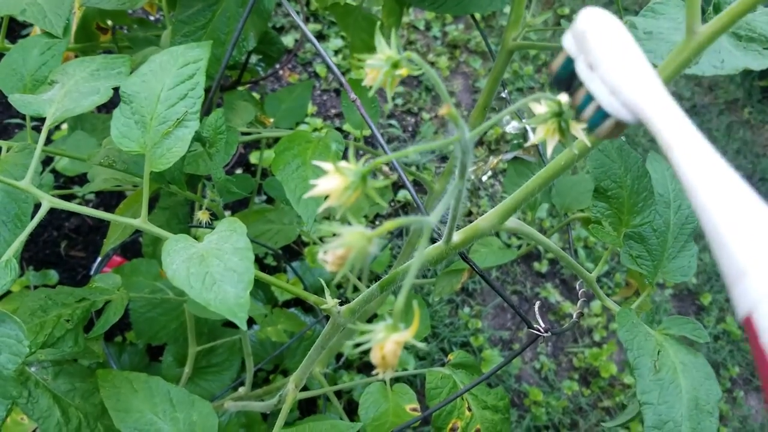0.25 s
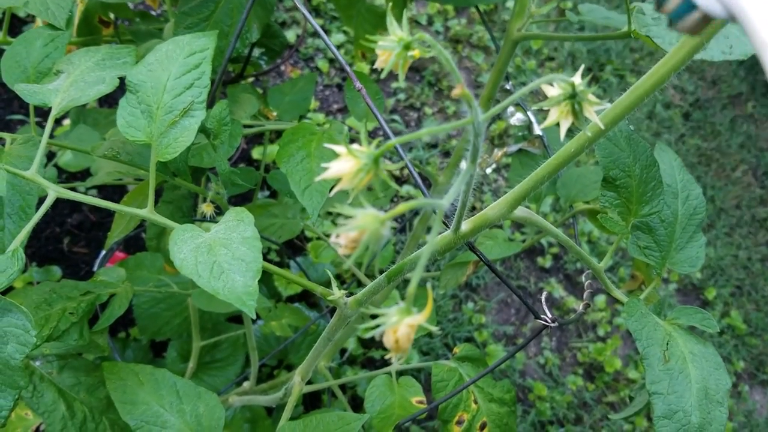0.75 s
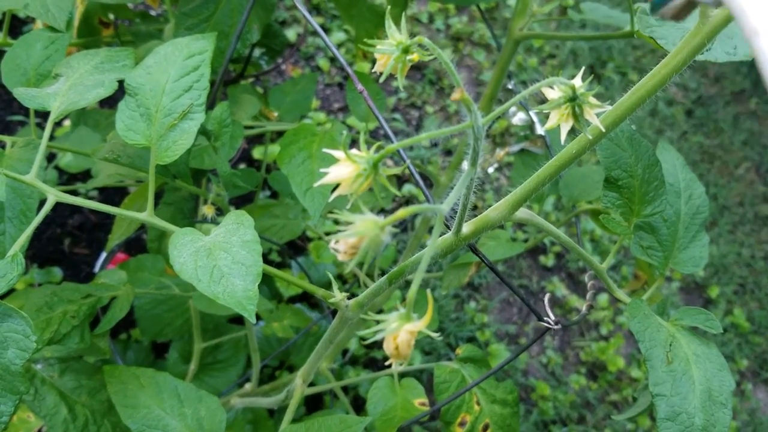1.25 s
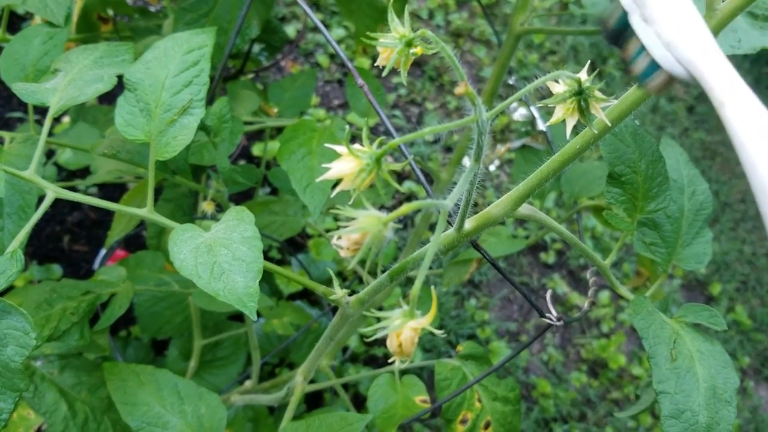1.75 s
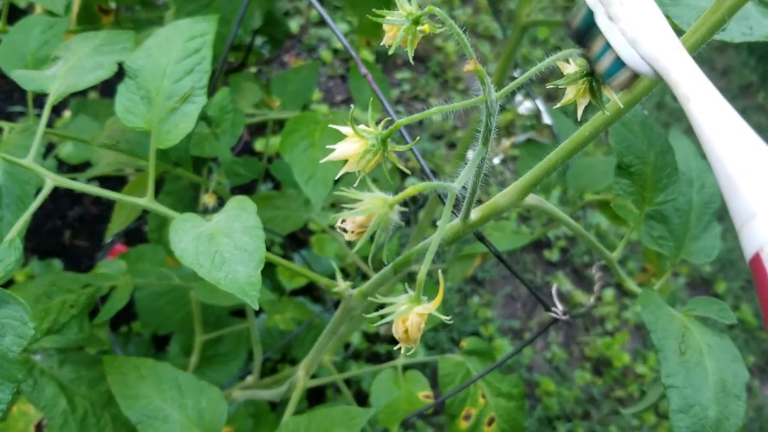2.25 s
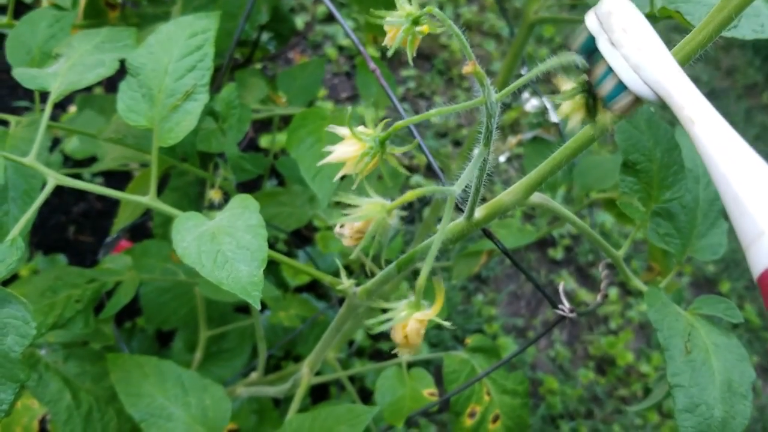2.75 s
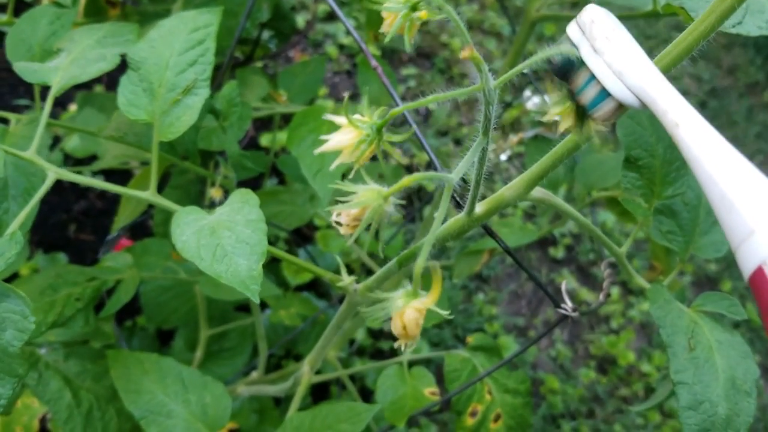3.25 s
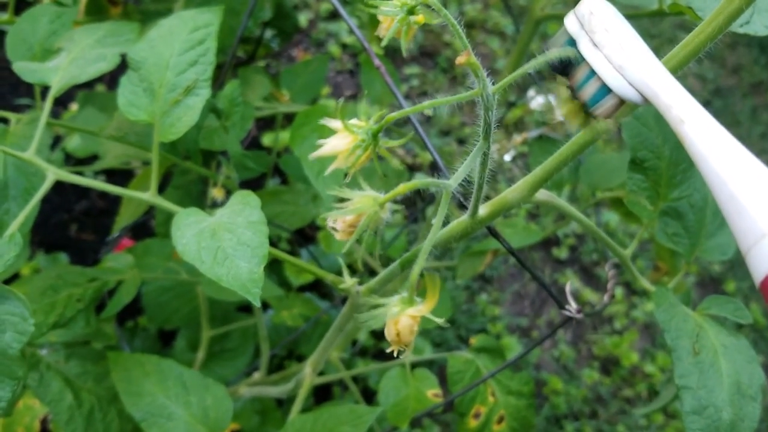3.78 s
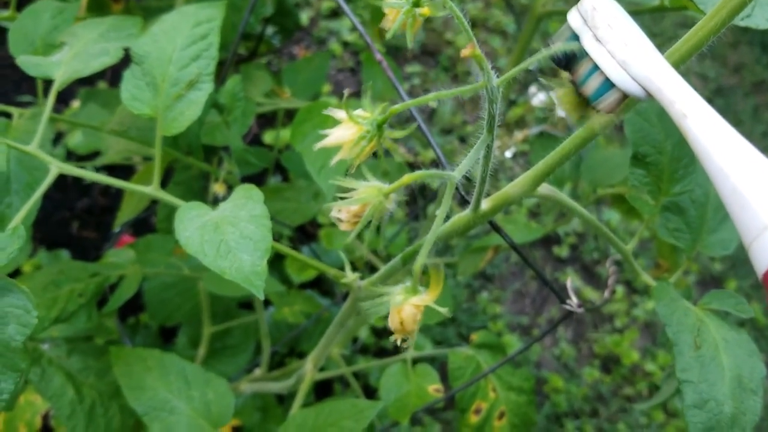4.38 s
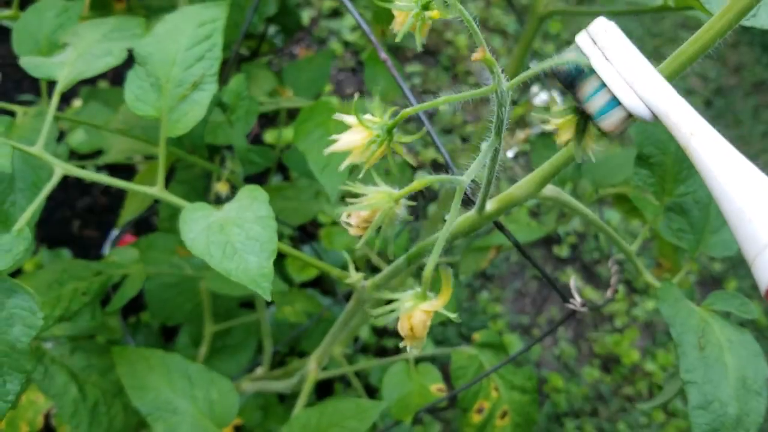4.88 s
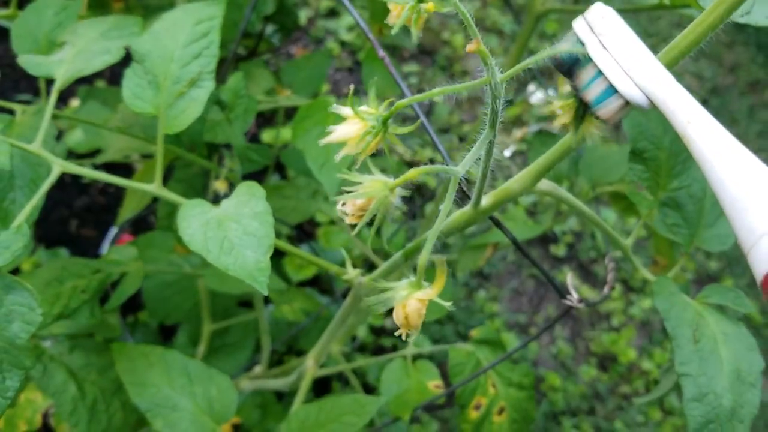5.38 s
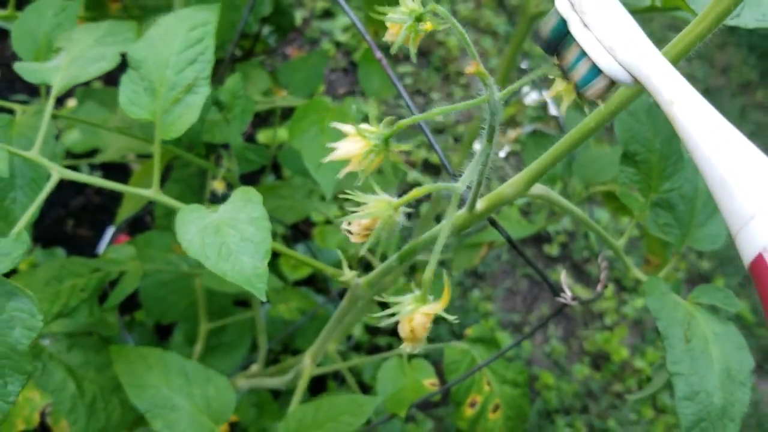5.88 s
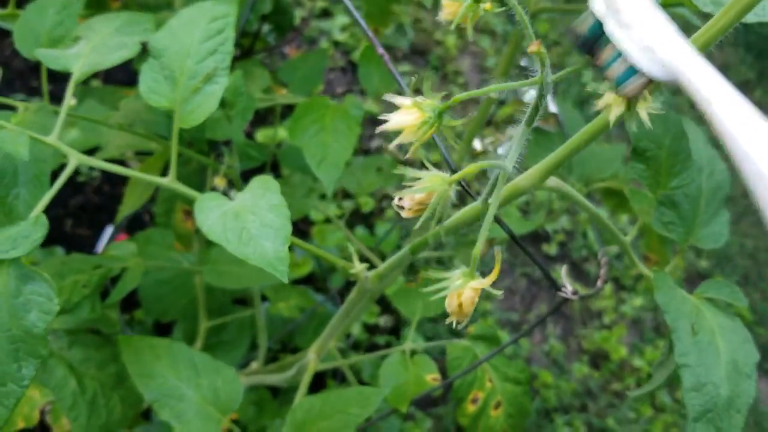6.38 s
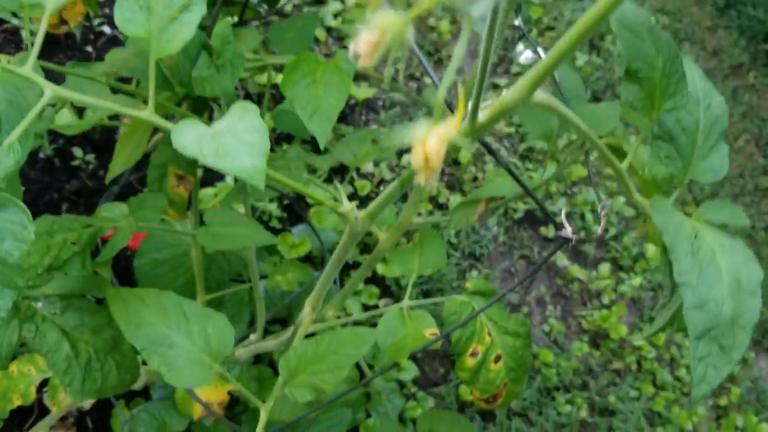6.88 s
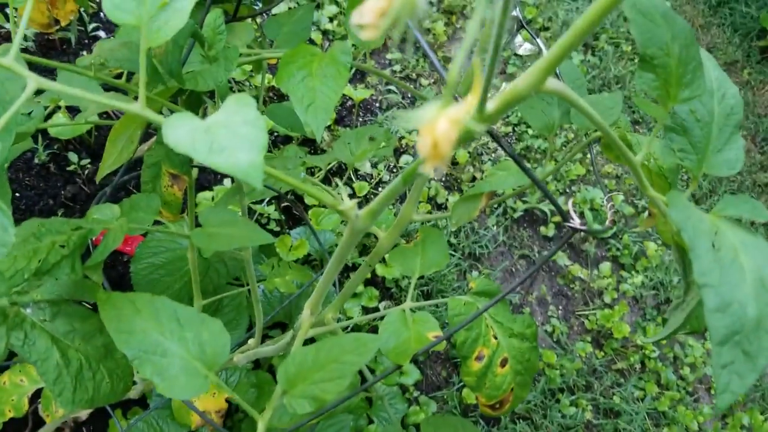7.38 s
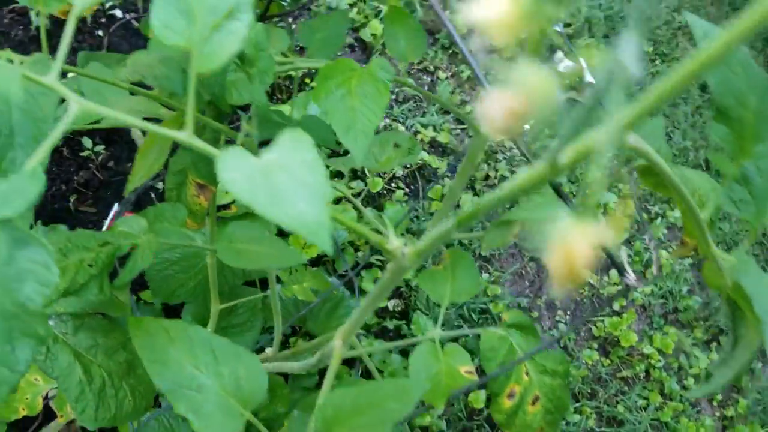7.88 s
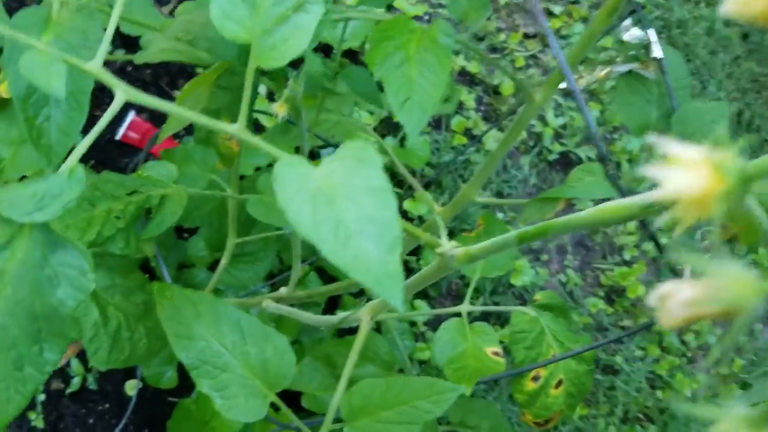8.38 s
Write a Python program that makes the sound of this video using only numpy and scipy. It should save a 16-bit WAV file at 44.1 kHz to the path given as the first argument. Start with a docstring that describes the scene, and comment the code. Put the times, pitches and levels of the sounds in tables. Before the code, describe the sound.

Soft birdsong over faint neighbourhood rumble, a sharp switch click, then a close, rattling, hissing electric toothbrush motor running with dry slaps and brief chatter.

```python
"""A bird trills over the rumble of the neighbourhood in a quiet garden, buzzes once, then gives three two-voiced calls.
A thumb creaks on a button and snaps it home: an electric toothbrush starts and is held to a tomato flower stalk.
Its loose drive knocks several times in each of some 49 strokes a second, a hissing buzz coloured by shell and hold.
Hard single slaps of the head stand out, and the rumble soon sinks away. Later the shell chatters and sings
in a looser grip, as the brush is withdrawn and lowered."""
import sys
import numpy as np
from scipy import signal
from scipy.fft import rfft, irfft
from scipy.io import wavfile
from scipy.ndimage import uniform_filter1d

SR = 44100
rng = np.random.default_rng(int(sys.argv[2]) if len(sys.argv) > 2 else 0)


def wav_record(signal):
    """Record a signal, one row per channel, as 16-bit PCM in the file named by sys.argv[1]."""
    frames = np.transpose(np.atleast_2d(signal))
    bounded = np.clip(frames, -1, 1)
    # unit amplitude maps onto the largest positive 16-bit level
    quanta = np.round(bounded * 32767).astype(np.int16)
    wavfile.write(sys.argv[1], SR, quanta)


N = 381024
TIME = np.arange(N) / SR   # seconds

# Loudness curve of the brush. Each row: time in seconds, relative level in dB.
BRUSH_LOUDNESS = [(1.45, -25.5), (1.6, -23.5), (1.82, -21.5), (2.15, -24), (2.45, -27), (2.75, -29),
                  (3.2, -27.5), (3.95, -25), (5.0, -26), (5.55, -25), (5.95, -26.5), (6.15, -25),
                  (6.62, -27), (7.4, -24.5), (8.0, -26), (8.64, -24.5)]
# Hand movement. Each row: time in seconds, hold (0 lifted, 1 on the stalk, 2 withdrawn, 3 lowered; fractions blend).
HAND = [(1.4, 0.35), (2.0, .01), (2.7, 0.99), (6.45, 0.99), (6.8, 1.43), (7.2, 1.83), (7.75, 1.36),
        (8.0, 2.94), (8.25, 2.98)]
# Swell of the low air and the drone. Each row: time in seconds, relative level in dB.
LOW_AIR_SWELL = [(2.4, -2.5), (3.35, -0.5), (3.75, -1), (3.95, 2.5), (5.7, 3.5), (6.1, -1), (7.0, 3),
                 (7.6, 4), (8.6, -0.5)]


def from_db(db):
    """Decibels to gain."""
    return 10 ** (np.asarray(db) / 20)


def rms_one(x):
    """Scale to unit power."""
    return x / np.sqrt(np.mean(x ** 2) + 1e-20)


def in_time(rows):
    """Each column of a curve, read at every sample."""
    s, *columns = np.transpose(rows)
    return [np.interp(TIME, s, column) for column in columns]


def at_hz(points, hz, axis=1):
    """Read one column of a spectrum on a log-frequency axis."""
    points = np.array(points)
    return np.interp(np.log(hz + 1), np.log(points[:, 0]), points[:, axis])


def filtered(x, hz, kind, order=2):
    """Causal Butterworth filter: low-, high- or band-pass."""
    return signal.sosfilt(signal.butter(order, hz, kind, fs=SR, output="sos"), x)


def ring(x, hz, t60):
    """A resonance: a unit click sets a decaying sine ringing."""
    radius = from_db(-60 / (t60 * SR))
    w = 2 * np.pi * hz / SR
    return signal.lfilter([0, np.sin(w)], [1, -2 * radius * np.cos(w), radius * radius], x + 1e-18)


def struck(push, modes):
    """A struck body: every mode rings after each click, with alternating sign."""
    return sum((-1) ** k * from_db(db) * ring(push, hz, t60) for k, (hz, db, t60) in enumerate(modes))


def fade(x, seconds):
    """Each click leaves an exponential tail."""
    return signal.lfilter([1], [1, -np.exp(-1 / (seconds * SR))], x + 1e-18)


def clicks(times, sizes):
    """Impulses at the given times."""
    return np.bincount(np.clip(np.asarray(times) * SR, 0, N - 1).astype(int), sizes, N)


def late(x, ms):
    """Delay by some milliseconds."""
    lag = int(round(ms * SR / 1000))
    return np.roll(x, lag, axis=-1) * (np.arange(N) >= lag)


def wavering(depth_db, rate_hz):
    """A gain that wanders at random."""
    return from_db(depth_db * rms_one(filtered(rng.standard_normal(N), rate_hz, "low")))


def bird_notes():
    """The song as notes: start in s, length in s, pitch in Hz, fall in Hz, relative dB, roughness 0-1."""
    clear = 0.064   # roughness of a clear whistle
    # a trill of even notes sinks in pitch and swells to full level
    notes = []
    for k in range(6):
        level_db = min(-46.5 + 2 * k, -40)
        notes.append((-.031 + k * .0686, .042, 4640 - k * 20, 30, level_db, clear))

    # One buzzy note of several voices at once. Each row: pitch in Hz, relative level in dB, roughness 0-1.
    buzz_voices = [(4570, -60.5, 0.09), (4530, -60, 1.0), (3940, -59, 0.45)]
    notes += [(0.4, 0.29, hz, 0, db, rough) for hz, db, rough in buzz_voices]

    # Two-voiced calls, each led in by a thin rising lisp. Each row: start in seconds, relative level in dB.
    calls = [(.788, -50), (1.045, -49.5), (1.23, -50)]
    call_s = 0.078
    for s, db in calls:
        lisp = (s - 0.042, 0.05, 7370, -630, db - 22, 1)
        lower_voice = (s, call_s, 4480, 20, db, clear)
        upper_voice = (s, call_s, 4790, 0, db - 6, 0.26)
        notes += [lisp, lower_voice, upper_voice]

    # Faint chirps of other birds. Each row: start in seconds, length in seconds, pitch in Hz, fall in Hz,
    # relative level in dB, roughness 0-1.
    chirps = [(0, 0.048, 3170, -650, -54, 0.6), (.025, 0.073, 2900, 120, -56, 0.3),
              (.18, .09, 8250, -350, -75, .4), (.67, 0.04, 2920, 40, -56, 0.25),
              (.735, 0.056, 2990, 0, -64, .3)]
    return notes + list(chirps)


def bird(level_db=2, pan_db=3.5, arch_hz=75, rasp_hz=300, echo_db=-17, echo_s=.07, flutter_db=1, flutter_hz=90):
    """Slightly arched whistles, roughened by random pitch jitter, with a thin echo from the trees."""
    song = np.zeros(N)
    for s, length, hz, fall_hz, db, rough in bird_notes():
        at = np.flatnonzero((TIME > s) & (TIME < s + length))
        u = (TIME[at] - s) / length   # 0 to 1 through the note
        rasp = rms_one(uniform_filter1d(rng.standard_normal(SR), size=50))[:len(at)]
        arch = np.sin(np.pi * u) - np.pi / 4
        pitch = hz + fall_hz * (.5 - u) + arch_hz * arch + rasp_hz * rough * rasp
        whistle = np.sin(2 * np.pi * np.cumsum(pitch) / SR)
        song[at] += from_db(db + level_db) * np.sin(np.pi * u) * whistle
    song = song * wavering(flutter_db, flutter_hz)
    trees = rng.standard_normal((2, SR // 2)) * np.exp(-TIME[:SR // 2] / echo_s)
    trees = trees / np.sqrt(np.sum(trees[0] ** 2))
    echo = signal.oaconvolve(song[None], trees, axes=1)[:, :N]
    return (song + from_db(echo_db) * echo) * from_db([[pan_db], [-pan_db]])


def air(spectrum, top_hz):
    """Smooth distant noise of unit power, most alike in both ears in the bass."""
    # Each row: frequency in Hz, left-right likeness from 0 to 1.
    likeness = [(30, 1), (125, 0.89), (300, 0.53), (1000, 0.46), (3000, 0), (16000, 0.076)]
    hz = np.fft.rfftfreq(N, 1 / SR)
    mid, side = rfft(rng.standard_normal((2, N))) * from_db(at_hz(spectrum, hz)) * (hz < top_hz)
    alike = np.clip(at_hz(likeness, hz), -1, 1)
    return rms_one(irfft(np.sqrt(1 + alike) * mid + np.sqrt(1 - alike) * side * [[1], [-1]], N))


def band_of_air(edges_hz):
    """One narrow band of distant noise; unit power."""
    return rms_one(filtered(air([(20, 0), (2000, 0)], top_hz=2000), edges_hz, "band", order=3))


def patchy(x, depth_db=2.5, rate_hz=7, edges_hz=(20, 90, 170, 280, 400, 2000)):
    """Each band of the low air comes and goes by itself; unit power."""
    hz = np.fft.rfftfreq(N, 1 / SR)
    spectrum = rfft(x)
    bands = [irfft(spectrum * ((hz >= low) & (hz < high)), N) for low, high in zip(edges_hz, edges_hz[1:])]
    return rms_one(sum(band * wavering(depth_db, rate_hz) for band in bands))


def low_air():
    """Soft low noise in restless bands, with a faint flickering band above it."""
    # Each row: frequency in Hz, relative density in dB.
    low_spectrum = [(88, -19), (150, -6.5), (200, -5), (292, 0.5), (365, -5), (420, -1.5), (480, -6),
                    (700, -43), (1190, -120)]
    level = from_db(-60 + in_time(LOW_AIR_SWELL)[0])
    bed = level * wavering(1.7, 7.1) * patchy(air(low_spectrum, top_hz=498))
    flicker = from_db(-68.5) * wavering(7.5, 7) * band_of_air((630, 790))
    return bed + flicker


def drone(pitch_hz=113, t60=0.17, level_db=-68.5, waver_db=3.5, waver_hz=9.1):
    """Noise through one narrow resonance: a faint far drone that wavers at random and swells once."""
    tone = rms_one(ring(filtered(rng.standard_normal(N), [70, 200], "band"), pitch_hz, t60))
    swell_db = 6 * np.exp(-((TIME - 3.95) / 0.11) ** 2)   # centre and width in seconds
    return tone * wavering(waver_db, waver_hz) * from_db(level_db + swell_db + in_time(LOW_AIR_SWELL)[0])


def garden():
    """Shaped noise: distant rumble, the low air and drone left when it sinks, and a faint hiss."""
    # Spectrum of the distant rumble. Each row: frequency in Hz, relative density in dB.
    rumble_spectrum = [(15, -41), (25, -24), (54, -0.5), (112, -0.5), (352, -11), (426, -16.5), (744, -8.5),
                       (885, -10), (966, -16), (1600, -44), (2080, -74), (3520, -120)]
    # Course of the rumble. Each row: time in seconds, relative level in dB.
    rumble_course = [(0, -0.5), (2.2, 1), (2.45, -16), (2.7, -22), (8.64, -20)]
    # Hiss of foliage and insects. Each row: frequency in Hz, relative density in dB.
    foliage = [(550, -20), (710, -16), (1200, 1), (1820, -10.5), (2100, -1.5), (3000, 3.5), (4040, -6.5),
               (4620, 1), (5200, -3), (5600, -30), (6100, -22), (6500, -8), (7340, -16), (8100, -25),
               (10300, -21), (12000, -19), (15600, -23), (22000, -120)]
    rumble = from_db(in_time(rumble_course)[0])
    out = from_db(-52) * rumble * air(rumble_spectrum, top_hz=16000)
    out += np.clip(1 - rumble, 0, 1) * (low_air() + drone())
    # a soft low swell as the motor starts: centre and width in seconds
    swell = np.exp(-((TIME - 1.56) / 0.11) ** 2)
    out += from_db(-51) * swell * band_of_air((110, 210))
    return out + from_db(-60) * air(foliage, top_hz=16000)


def insect(pitch_hz=4640, t60=0.053, level_db=-67.5):
    """A far insect's thin whine: noise through one narrow resonance."""
    return from_db(level_db) * rms_one(ring(rng.standard_normal((2, N)), pitch_hz, t60))


def switch(level_db=1, pan_db=4, lag_ms=0.26, crack_db=-4, crack_s=0.0015, soft_hz=3800, thin_hz=750):
    """The button creaks dully under the thumb, then snaps home: clicks ring the modes of switch and shell."""
    # Each row: time in seconds, relative level in dB, hardness 0-1.
    thumb = [(.266, -41, 0), (.657, -44, 0), (.928, -34, 0), (0.933, -30, 0.3), (.944, -50, 0.3),
             (.953, -45, 0.2), (0.969, -37, 0.13), (1.385, -39, .03), (1.391, -27, 0.5), (1.393, -4, 0.4),
             (1.402, -19, 0.14)]
    # Modes of switch and shell. Each row: frequency in Hz, relative level in dB, 60 dB decay in seconds.
    switch_modes = [(754, -23, 0.011), (2020, 7.5, 0.004), (2390, 8.5, 0.0033), (2680, -4.5, 0.016),
                    (3280, -2, 0.0058), (4280, -4, 0.018), (5000, 2.5, 0.0068), (7150, -13, .004),
                    (12100, -15.5, .003)]
    s, db, hardness = np.transpose(thumb)
    size = from_db(db + level_db)
    hard = clicks(s, size * hardness)
    soft = filtered(clicks(s, size * (1 - hardness)), soft_hz, "low", order=3)
    crack = from_db(crack_db) * fade(hard, crack_s) * rng.standard_normal(N)
    body = filtered(struck(hard + soft, switch_modes) + crack, thin_hz, "high")
    return np.array([late(body, lag_ms) * from_db(pan_db), body * from_db(-pan_db)])


def by_hold(values):
    """A quantity that glides between its values in the four holds as the hand moves."""
    return np.interp(in_time(HAND)[0], np.arange(len(values)), values)


def rattle(uneven_db=3.5, jitter_s=0.00033, contact_s=0.00068, after_s=0.0087, after_db=-13, rub_db=-18):
    """Force envelope of the drive: knocks at near-fixed points of the stroke over the rubbing of the gears."""
    # Drive speed, climbing after the start, with a small rise and dip near 6 s.
    # Each row: time in seconds, strokes per second.
    speed = [(1.39, 47.35), (2.3, 48.2), (3.3, 49.27), (5.6, 49.33), (6.1, 49.93), (6.6, 48.88),
             (7.3, 49.48), (8.3, 49.62)]
    # Contacts within one stroke. Each row: share of the cycle, relative level in dB.
    contacts = [(0, 0), (0.16, -23), (0.35, -2.5), (0.582, -3.5), (.76, 0), (0.829, -2)]
    # How hard the play in the drive knocks against the rubbing: one relative dB for each hold.
    play_in_hold = (-10.5, -4, -9, -6)
    loud_db = in_time(BRUSH_LOUDNESS)[0]
    play_db = by_hold(play_in_hold) + loud_db - loud_db.mean()   # a louder brush knocks harder
    turns = np.cumsum(in_time(speed)[0]) / SR
    turns = turns - np.interp(4.2358, TIME, turns) % 1   # a stroke begins at this second
    strokes = np.arange(int(turns[-1]))
    hits = np.zeros(N)
    for share, level_db in contacts:
        chance = rng.standard_normal((len(strokes), 2))
        times = np.interp(strokes + share, turns, TIME) + jitter_s * chance[:, 0]
        hits += clicks(times, from_db(level_db + uneven_db * np.minimum(chance[:, 1], 1)))
    power = (hits * from_db(play_db)) ** 2
    # short contact, longer after-rattle, steady rubbing
    power = fade(power, contact_s) + from_db(after_db) ** 2 * fade(power, after_s) + from_db(rub_db) ** 2
    return np.sqrt(power / uniform_filter1d(power, SR // 6))   # evens out the slow level


def minimum_phase(log_gain):
    """Phase of the causal filter that has this log gain."""
    cepstrum = irfft(log_gain)
    half = len(cepstrum) // 2
    return np.imag(rfft(2 * cepstrum[:half], 2 * half))


def coloured(common, scattered, colour, lead, size=1024):
    """Straight and scattered rattle in both ears, in one hold's colour, with the bass filtered out."""
    # Share that arrives straight, not scattered by leaves. Each row: frequency in Hz, share 0-1.
    direct = [(1000, 0.49), (2400, 0.39), (4800, 0.36), (6500, 0.32), (8500, .22), (15000, 0.14)]
    hz = np.fft.rfftfreq(size, 1 / SR)
    gains = from_db([at_hz(colour, hz, axis=1), at_hz(colour, hz, axis=2)])
    left_only = np.array([[1], [0]])
    phase = minimum_phase(np.log(gains).mean(0)) + at_hz(lead, hz) * left_only
    response = gains * np.exp(1j * phase)
    share = np.clip(at_hz(direct, hz), 0, 1)
    out = 0
    for x, part in ((np.array([common, common]), share), (scattered, 1 - share)):
        # room ahead of the main tap lets an ear lead
        taps = np.roll(irfft(response * np.sqrt(part)), size // 8, axis=1)
        out = out + signal.oaconvolve(x, taps, axes=1)[:, size // 8:][:, :N]
    return filtered(out, 654, "high", order=8)


def looseness():
    """Gain of the shell's singing: it swells, holds and is damped again with each loosening of the grip."""
    # Each row: start in seconds, length in seconds, relative level in dB.
    loose_grips = [(6.806, 0.17, -26.5), (7.254, 0.36, -29), (7.706, .15, -30)]
    loosen_db_per_s, tighten_db_per_s = 108, 137
    gain = from_db(-44)   # in a firm grip
    for s, length, db in loose_grips:
        before_s = np.maximum(s - TIME, 0)
        after_s = np.maximum(TIME - s - length, 0)
        gain = gain + from_db(db - loosen_db_per_s * before_s - tighten_db_per_s * after_s)
    return gain


def slid(x, shift_hz):
    """Move a ringing up or down in pitch by a changing amount; unit power."""
    return rms_one(np.real(signal.hilbert(x) * np.exp(2j * np.pi * np.cumsum(shift_hz) / SR)))


def shell(drive, ring_hz=2960, ring_t60=0.012, upper_hz=4200, upper_t60=0.0048, upper_db=-3, pan_db=3.0,
          chatter_t60=0.02, chatter_upper_db=-8):
    """Loosely held, the shell rings in two modes, and now and then chatters against the drive."""
    # The modes slide as the fingers shift. Each row: time in seconds, shift of the lower in Hz, of the upper in Hz.
    finger_slide = [(6.76, -170, 229.5), (6.86, -49, 31.5), (6.95, 60, -150), (7.3, 50, 110.5),
                    (7.6, 9.5, 130), (7.85, -89, 1)]
    # Single chatters. Each row: time in seconds, relative level in dB.
    chatters = [(6.802, -12), (6.824, -19), (6.856, -12), (6.865, -8), (6.8837, -7), (6.904, -13),
                (6.917, -16), (6.923, -17), (6.942, -7.5), (6.967, -14)]
    force = filtered(drive * rng.standard_normal(N), [2200, 5000], "band")
    lower_shift, upper_shift = in_time(finger_slide)
    lower = slid(ring(force, ring_hz, ring_t60), lower_shift)
    upper = slid(ring(force, upper_hz, upper_t60), upper_shift)
    sing = (lower + from_db(upper_db) * upper) * looseness()
    s, db = np.transpose(chatters)
    modes = [(ring_hz, 0, chatter_t60), (upper_hz, chatter_upper_db, upper_t60)]
    chatter = struck(clicks(s, from_db(db)), modes)
    both = sing + filtered(chatter, [2200, 5000], "band")
    return np.array([late(both, .32) * from_db(pan_db), both * from_db(-pan_db)])   # later in the left ear


def toothbrush(brush_db=1.88, treble_db=14.0, grain_db=3.5, start_s=1.393, spin_up_s=0.024):
    """The rattle drives noise through the shell; each hold has its own colour and direction."""
    # Colour in each hold. Each row: frequency in Hz, left level in dB, right level in dB, both relative.
    lifted = [(520, -37, -55), (850, -22.5, -35), (1110, -23.5, -26.5), (2060, -0.5, -11.5),
              (2380, 1.5, -20.5), (3430, 4, 1.5), (3460, 7, -23), (4340, -13.5, -3.5), (5430, -4, -7),
              (6400, -15, -10.5), (7260, -22, -9), (8150, -31, -25), (9600, -24, -20), (12900, -27, -15.5),
              (15700, -21, -27)]
    on_stalk = [(470, -19, -15.5), (903, -19, -24), (1067, -12.5, -14), (2270, -6, -10.5), (2210, -3, -6.5),
                (3340, 5, 0), (3880, -4.5, -9), (4200, 4, 1), (4720, 0.5, -1.5), (4910, 3.5, 3),
                (5290, -6.5, -4), (6260, -7.5, -7), (6970, -17, -12), (8280, -21.5, -22), (10700, -14, -14),
                (10900, -20.5, -18), (16000, -22, -21.5)]
    withdrawn = [(544, -31, -20.5), (836, -12.5, -14), (1170, -13.5, -11.5), (1820, -3, -7),
                 (2140, -10, -7.5), (3200, -1, 1), (3650, 2.5, 1), (4280, 2.5, 8), (4540, -7, -3),
                 (5350, -1, 3.5), (5760, -8, -6.5), (7300, -10.5, -9.5), (8300, -17, -15.5),
                 (10200, -11.5, -11), (13300, -17, -14.5), (15800, -13, -25)]
    lowered = [(533, -12, -4.5), (666, -19.5, -19.5), (1200, -15.5, -15), (1970, -12.5, -14.5),
               (2370, -5, -5), (2800, 0.5, -4.5), (3120, -1, -7), (3650, 1.5, 0), (4300, 0.5, -2.5),
               (4880, 3, 1), (5660, -12.5, -9.5), (7260, -12.5, -10.5), (8550, -24, -24),
               (10100, -17, -15.5), (11000, -21, -18), (12000, -19, -15), (15500, -19, -22)]
    # One curve for each hold: how far the left ear leads. Each row: frequency in Hz, phase in radians.
    left_leads = ([(1000, -.2), (2400, -4.6), (4000, -8.2), (5600, -9), (6500, -10.3), (9000, -11.2),
                  (16000, -11.5)], [(1400, .1), (2200, 2.5), (3000, 2.1), (4100, 3.9), (4900, 4.9),
                  (5600, 2.4), (6900, 1.2), (8400, 2.4), (10200, .5), (11500, 1.7), (13500, .6),
                  (16000, 2.2)], [(900, -.1), (1500, -1.8), (2400, -4.8), (3200, -6.3), (4400, -8.2),
                  (5500, -10.3), (7200, -13.4), (11000, -19), (16000, -28)], [(1000, -.2), (1800, -2.6),
                  (2700, -4.4), (3400, -6.8), (4400, -8.8), (5500, -11), (7200, -14.6), (11000, -21),
                  (16000, -31)])
    # How much treble is aimed at the listener: one relative dB for each hold.
    aim_in_hold = (-10, -10, -15, -10)
    spin_up = (1 - np.exp(-np.maximum(TIME - start_s, 0) / spin_up_s)) ** 2
    drive = rattle() * spin_up
    grain = rms_one(from_db(grain_db * rng.standard_normal(N)))   # each contact is a cluster of tiny slips
    level = from_db(in_time(BRUSH_LOUDNESS)[0] + brush_db)
    force = drive * grain * level * rng.standard_normal((3, N))   # one common, two scattered
    hold = in_time(HAND)[0]
    out = 0
    for k, (colour, lead) in enumerate(zip((lifted, on_stalk, withdrawn, lowered), left_leads)):
        pair = coloured(force[0], force[1:], colour, lead)
        nearness = np.sqrt(np.clip(1 - abs(hold - k), 0, 1))
        out = out + pair * np.std(force) / np.std(pair) * nearness
    # the treble beams, so it follows the aim of the head
    treble = signal.sosfiltfilt(signal.butter(2, 8000, "high", fs=SR, output="sos"), out)
    return out + treble * (from_db(by_hold(aim_in_hold) + treble_db) - 1) + shell(drive)


def knocks(level_db=-2, bounce_ms=.42, bounce_db=-9, lag_ms=.7, pan_db=1, crack_db=-3.0, crack_s=0.001):
    """Now and then the head slaps its shaft with a dry crack and bounces once; no two slaps ring alike."""
    # Single hard slaps. Each row: time in seconds, relative level in dB, left over right in relative dB.
    slaps = [(1.4243, -19, -1), (1.6934, -20, 4), (1.7176, -18, .5), (1.8534, -18, -3), (1.943, -12, -7),
             (1.9644, -14, -1), (2.0272, -13, .5), (2.0822, -20, 3), (2.094, -12, 1.5), (2.1461, -14, -2),
             (2.153, -11, -3), (2.2147, -13.5, 0), (2.2513, -13.5, -2), (2.3752, -15, 4),
             (3.1158, -15.5, -4), (3.5197, -13, .5), (3.7078, -18, -1), (3.769, -19, 1.5),
             (3.8666, -13, 1.5), (3.9064, -16.5, -2), (3.9303, -16.5, 1.5), (4.0345, -13, 0),
             (4.0924, -12, -5), (4.215, -20, 1.5), (4.2343, -16, 0), (4.2968, -8, 0), (4.4576, -13, 6),
             (4.499, -15, 1), (4.6577, -11, 1), (4.7024, -12.5, -1), (5.2094, -19, 5), (5.5338, -11, -1),
             (5.5942, -21, .5), (5.7945, -20, 1), (6.0774, -17, 4), (6.157, -10.5, 2), (6.2379, -13, 1),
             (6.2575, -11.5, 0), (6.3144, -17, -2), (6.3583, -12, -1), (6.395, -13, 1), (6.418, -17, -2),
             (6.4356, -13, -1), (6.9845, -21, .5), (7.251, -12, 0), (7.4111, -12.5, -3), (7.5127, -19, .5),
             (7.5723, -12.5, 2)]
    # Modes of the brush head. Each row: frequency in Hz, relative level in dB, 60 dB decay in seconds.
    head_modes = [(2780, -5.5, 0.0021), (4390, -3.5, 0.0079), (4950, 0.5, 0.0077), (6220, -4, 0.0057),
                  (10250, -5, 0.0017), (13600, -11, 0.0023)]
    s, db, side_db = np.transpose(slaps)
    mode_db = 2.5 * rng.standard_normal((len(s), len(head_modes)))
    ears = []
    for sign in (1, -1):
        size = from_db(db + level_db + sign * (side_db / 2 + pan_db))
        body = 0
        for k, mode in enumerate(head_modes):
            body = body + (-1) ** k * struck(clicks(s, size * from_db(mode_db[:, k])), [mode])
        crack = from_db(crack_db) * fade(clicks(s, size), crack_s) * rng.standard_normal(N)
        slap = body + from_db(bounce_db) * late(body, bounce_ms) + crack
        ears.append(filtered(late(slap, lag_ms), 2100, "high", order=3))
    return np.array(ears)


def hollowed(pair, centre_hz=576, sway_hz=46.4, width_hz=140, sway_rate_hz=9):
    """A wandering notch takes out the low mids while the brush runs."""
    # Depth of the hollow. Each row: time in seconds, share taken out 0-1.
    hollow_depth = [(1.45, 0), (1.95, 0.96), (2.5, 0.49), (7.7, 0.32), (8.1, .1)]
    centre = centre_hz + sway_hz * rms_one(filtered(rng.standard_normal(N), sway_rate_hz, "low"))
    carrier = np.exp(2j * np.pi * np.cumsum(centre) / SR)
    # shift the centre down to zero, keep a narrow band, shift it back
    band = signal.sosfiltfilt(signal.butter(2, width_hz / 2, fs=SR, output="sos"), pair / carrier)
    return pair - np.clip(in_time(hollow_depth)[0], 0, 1) * 2 * np.real(band * carrier)


def scene():
    """Birds, switch and brush over the garden air."""
    return bird() + insect() + switch() + hollowed(toothbrush() + garden()) + knocks()


def record(dry):
    """The highest peaks are rounded, the top is cut."""
    return signal.sosfilt(signal.ellip(10, .1, 80, 15850, fs=SR, output="sos"), np.tanh(dry))


dry = scene()
out = record(dry)
wav_record(out)
```